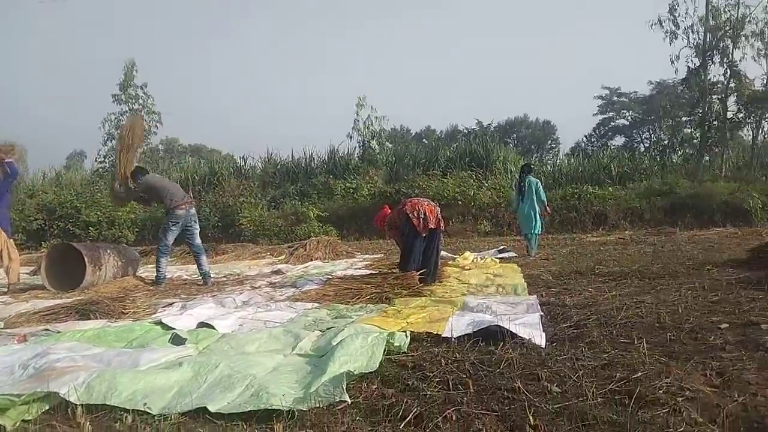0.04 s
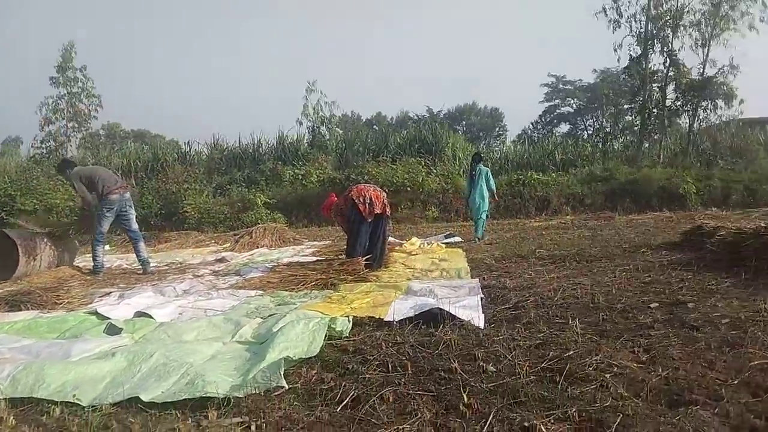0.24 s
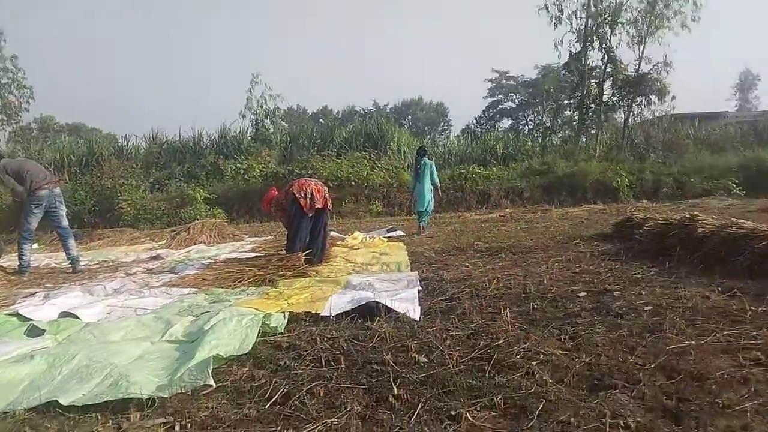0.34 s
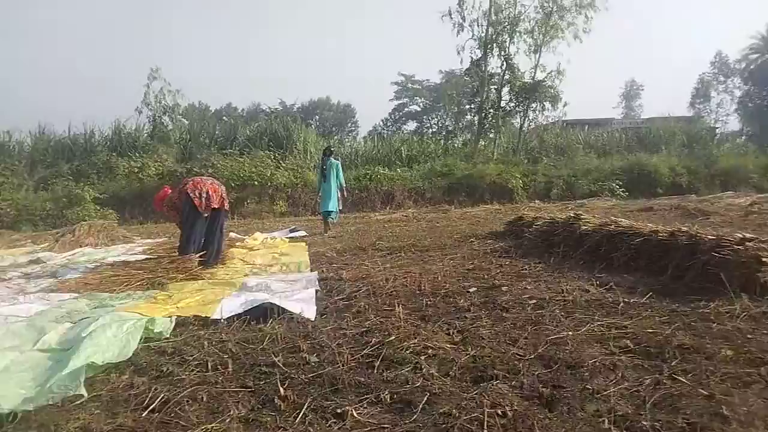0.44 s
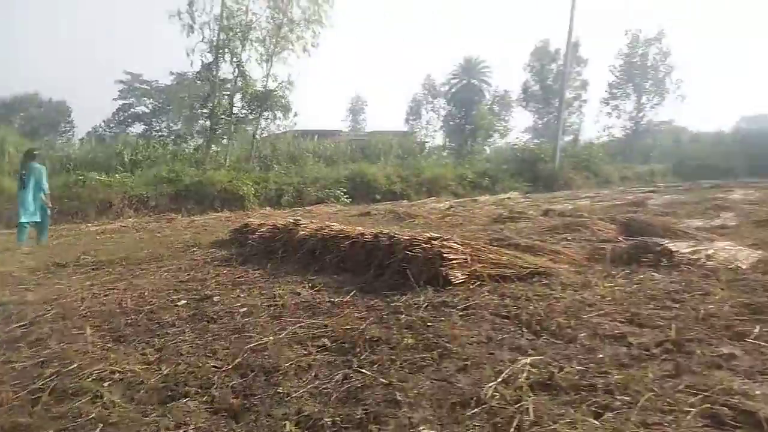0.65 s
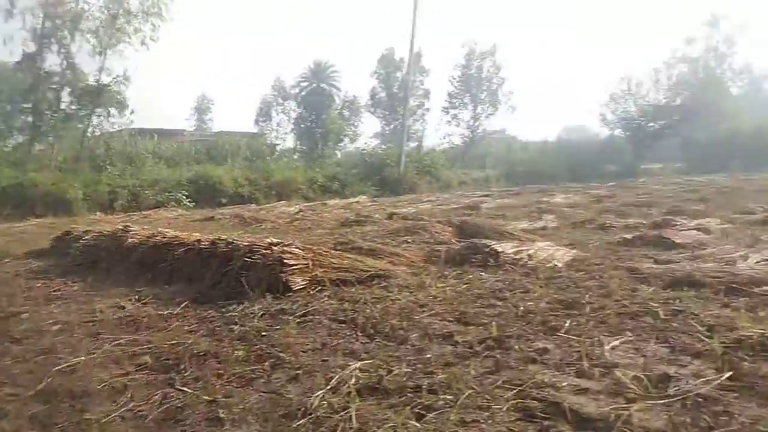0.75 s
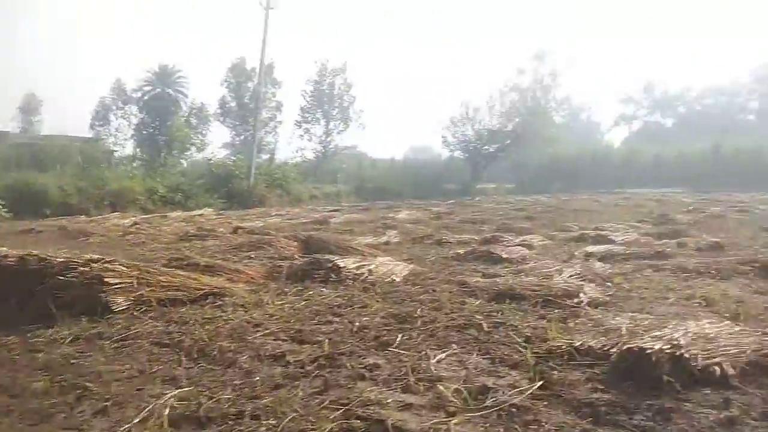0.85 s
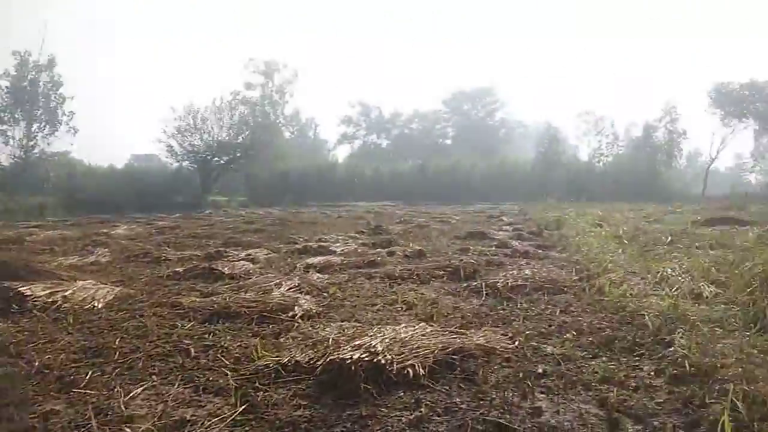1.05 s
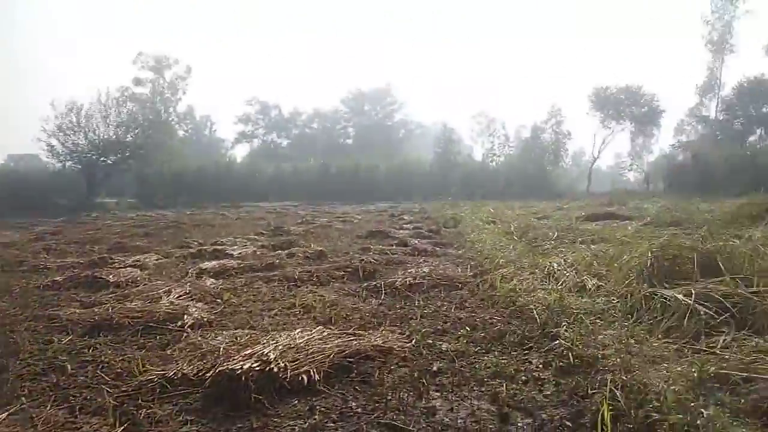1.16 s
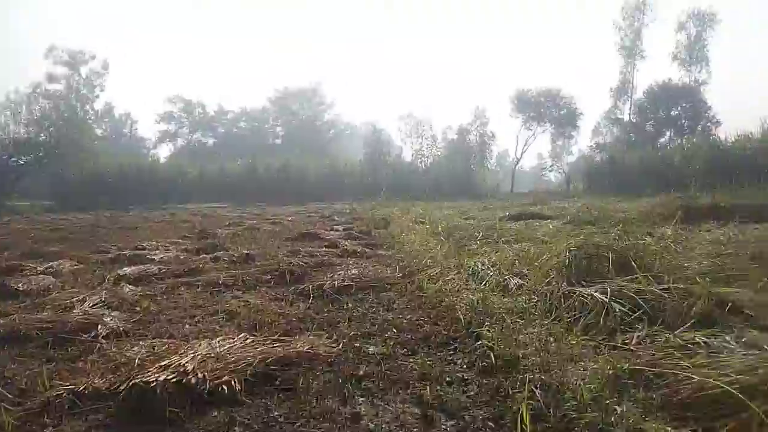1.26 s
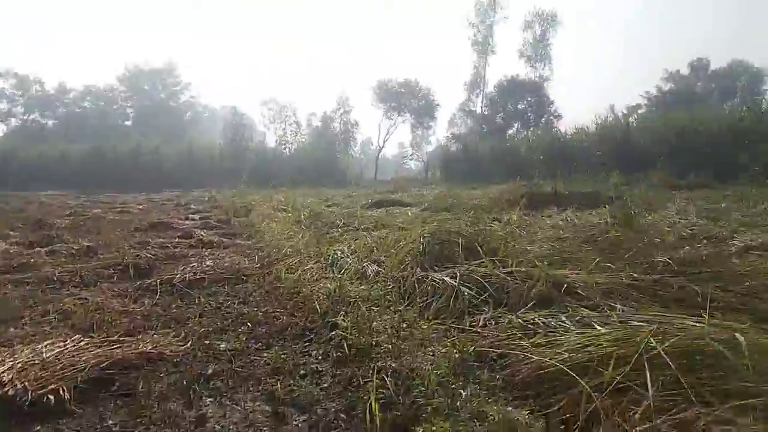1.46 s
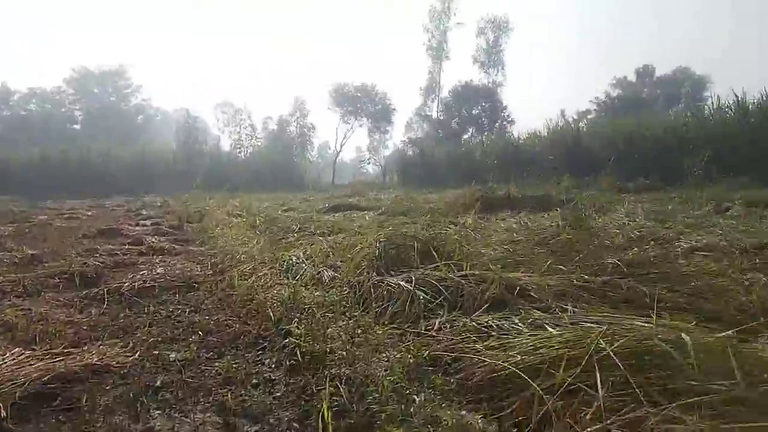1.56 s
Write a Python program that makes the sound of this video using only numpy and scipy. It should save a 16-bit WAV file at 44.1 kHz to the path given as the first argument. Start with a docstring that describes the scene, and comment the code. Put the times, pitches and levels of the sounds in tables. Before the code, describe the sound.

Rice sheaves hit a barrel twice, each a sharp slap with a hollow thud, brief ring and echo. Dry straw then hisses and crackles close to the microphone, while a far engine throbs faintly across the open field.

```python
"""Two sheaves of rice are swung down on a barrel lying in an open field.
At first dry straw rustles close by, while a far engine throbs under the faint hiss of the field.
At 0.24 s hundreds of stalks slap the shell, which thuds and rings briefly; the field's edge echoes it.
The sheaf sags, then the second one swishes down and lands at 0.68 s with an echo of its own.
Loose straw hisses as it settles, and from about 1 s nearby stalks crackle and snap."""
import sys
import numpy as np
from scipy import signal
from scipy.fft import rfft, irfft
from scipy.io import wavfile

SR = 44100
rng = np.random.default_rng(int(sys.argv[2]) if len(sys.argv) > 2 else 0)


def store_wav(level_fs):
    """Save 16-bit WAV to argv[1]."""
    pcm = np.round(np.clip(np.atleast_2d(level_fs), -1, 1) * 32767)
    wavfile.write(sys.argv[1], SR, pcm.T.astype(np.int16))


N = 70560  # 1.6 seconds

# The tone of the cracking tips, the slap, the thud and the hollow barrel.
# Each row: frequency in Hz, relative level in dB.
CRACK_TONE = [(1500, -20), (3000, -3), (3800, -3.5), (4500, -6), (6300, 1.5), (8200, -8.5), (12000, -7.5),
              (15500, -7)]
SLAP_TONE = [(150, -55), (300, -23), (520, -5), (680, -18), (930, -9.5), (1250, -8), (1600, 0), (2000, -3),
             (2400, 1), (3200, -6.5), (4500, -14), (9000, -30)]
THUD_TONE = [(30, -31), (60, -27), (85, -9.5), (135, -0.5), (200, -11), (300, -24), (600, -46)]
HOLLOW_TONE = [(120, -19), (240, 4), (400, 3.5), (540, 0.5), (680, -4), (900, -8), (1200, -8), (1800, -44)]
def sheaf(start, landing, crack_db, slap_db, thud_db, hollow_db, ring):
    """Stalk tips crack as the bundle slaps the shell; its weight thuds and the barrel sounds hollow."""
    hold = 0.0047 / ring ** 2
    crack = coloured(clicks(), CRACK_TONE) * envelope(start, landing, fade=0.11, hold=0.0015)
    slap = coloured(clicks(), SLAP_TONE) * envelope(start, landing, fade=0.17 * ring, hold=hold)
    thud = noise(THUD_TONE) * envelope(start, rise=0.013, fade=0.14, hold=0.0025)
    hollow = noise(HOLLOW_TONE) * envelope(start, rise=0.022, fade=0.24 * ring ** 2, hold=hold)
    return amp(crack_db) * crack + amp(slap_db) * slap + amp(thud_db) * thud + amp(hollow_db) * hollow


# The barrel's notes; each blow lands on another spot, so their levels differ.
# Each row: pitch in Hz, fade in seconds, level in dB in the first blow, level in dB in the second.
BARREL_NOTES = [(112, .2, -31, -46), (145, .4, -32, -36), (196, .35, -29, -45), (293, .2, -33, -40),
                (373, .7, -40, -36), (516, .17, -30, -30), (772, .11, -25, -44), (1404, .28, -46, -34),
                (1447, .2, -42, -29), (1498, .15, -26, -42), (1558, .19, -36, -33), (1712, .16, -26, -37),
                (1879, .14, -31, -36), (2000, .07, -42, -23), (2258, .17, -38, -27), (2326, .17, -30, -33),
                (2432, .17, -32, -31), (2778, .19, -39, -35), (3020, .17, -36, -41), (3790, .11, -44, -33)]
def barrel(start, landing, blow):
    """The shell's notes build up while the stalks land and die under the straw."""
    t, out = np.arange(N) / SR, np.zeros(N)
    for hz, fade, *levels_db in BARREL_NOTES:
        note = np.sin(2 * np.pi * (hz * t + rng.random()))
        out += amp(levels_db[blow]) * envelope(start, 1.84 * landing, fade) * note
    return out


# The echo's tone. Each row: frequency in Hz, relative level in dB.
ECHO_TONE = [(60, -25), (100, 0.5), (160, 6.5), (250, 6), (400, 2), (650, 0.5), (930, -9), (1700, -1),
             (2600, -5.5), (4000, -17), (7000, -20), (15000, -41)]
# How long it lasts. Each row: frequency in Hz, fade in seconds.
ECHO_FADES = [(100, 0.93), (400, 1), (1000, 0.91), (2000, 0.97), (8000, .7)]
def echo(start, rise=0.084):
    """Trees and tall crops scatter a blow back, each band of pitch dying at its own speed."""
    hz, t, bands = signal.stft(noise(ECHO_TONE), SR, nperseg=512)
    age = np.maximum(t - start - rise, 0)
    dying = np.exp(-np.log(1000) * age / look_up(ECHO_FADES, hz)[:, None])
    swell = np.clip((np.arange(N) / SR - start) / rise, 0, 1)
    return signal.istft(bands * dying, SR)[1][:N] * swell


# The two blows. Each row: start in seconds, seconds the sheaf takes to land, levels in dB of the
# crack, slap, thud, hollow sound and echo, and a factor for how freely the shell sounds on.
SHEAF_BLOWS = [(.2425, 0.0094, -26, -22, -31, -27, -38, 0.75),
               (.6775, 0.0045, -27.5, -21.5, -39, -30.5, -39.5, 1.447)]
def threshing():
    """Each sheaf strikes the barrel and sets it ringing; gives the hits and their echoes separately."""
    hits, echoes = np.zeros(N), np.zeros(N)
    for blow, (start, landing, *levels_db, echo_db, ring) in enumerate(SHEAF_BLOWS):
        hits += sheaf(start, landing, *levels_db, ring) + barrel(start, landing, blow)
        echoes += amp(echo_db) * echo(start)
    return hits, echoes


def swing():
    """Straw brushes past as the second sheaf swings down."""
    return amp(-44.5) * envelope(start=0.641, rise=0.005, fade=0.16) * noise(SLAP_TONE)


# The tone of the sagging sheaf. Each row: frequency in Hz, relative level in dB.
THUMP_TONE = [(60, -25), (100, -6.5), (160, 4.5), (260, -8), (420, -12), (900, -50), (3000, -71)]
def sag():
    """Between the blows, the sheaf sags on the barrel with a soft, low thump."""
    return amp(-37.5) * envelope(start=0.393, rise=0.0099, fade=0.23) * noise(THUMP_TONE)


def gliding_band(start=0.29, start_hz=1627, hz_per_second=1900, width_hz=67):
    """A faint, narrow band of noise rises in pitch inside the first echo."""
    hz = start_hz + hz_per_second * (np.arange(N) / SR - start)
    phase = 2 * np.pi * np.cumsum(hz) / SR
    band = wander(width_hz) * np.cos(phase) + wander(width_hz) * np.sin(phase)
    return amp(-48.5) * envelope(start, rise=0.015, fade=0.37, hold=0.18) * band


# Close rustles. Each row: start, rise and fade in seconds, level in dB, brightness in dB per octave.
RUSTLE_BURSTS = [(0.019, 0.0035, 0.23, -55.5, 10.5), (0.086, 0.01, 0.28, -59, 7),
                 (0.173, 0.0032, 0.066, -56.5, 7), (1.009, 0.042, 0.11, -43.5, -1.5),
                 (1.093, 0.0084, 0.14, -47, -1), (1.123, 0.011, 0.24, -46.5, 1.5),
                 (1.143, 0.03, 0.16, -42, -3.5), (1.2, 0.01, 0.099, -50, 0), (1.232, 0.0033, 0.13, -45, 3),
                 (1.251, 0.0036, 0.23, -46.5, -2), (1.274, .005, 0.12, -45, -6.5),
                 (1.29, 0.0027, 0.097, -46.5, 1), (1.313, .003, 0.16, -43, 4.5),
                 (1.345, .004, 0.16, -46, 2), (1.355, 0.0067, 0.27, -46, -2),
                 (1.406, 0.0037, 0.14, -44.5, 6.5), (1.431, .005, .1, -46.5, 1),
                 (1.482, 0.0021, 0.33, -46.5, 6), (1.526, 0.014, 0.26, -49, 4), (1.557, .005, 0.28, -46, 4)]
# Their tone. Each row: frequency in Hz, relative level in dB.
RUSTLE_TONE = [(400, -27), (900, -30), (1600, -13), (2900, 5.5), (4400, -2), (6300, 4.5), (8200, -5.5),
               (11000, -15.5), (15500, -13)]
def rustling_straw():
    """Nearby stalks crackle in short, clumped bursts."""
    out = np.zeros(N)
    for start, rise, fade, db, bright_db in RUSTLE_BURSTS:
        crackle = coloured(clicks(per_second=8100, spread_db=3.5), RUSTLE_TONE, bright_db)
        out += amp(db) * envelope(start, rise, fade) * crackle
    clumps_db = wander(rate_hz=120)
    return out * amp(clumps_db)


# Single stems breaking. Each row: start in seconds, pitch in Hz, level in dB.
STEM_SNAPS = [(.843, 3800, -46), (1.116, 1250, -54), (1.13, 4200, -43), (1.2755, 6400, -43),
              (1.357, 3100, -45), (1.485, 6200, -42), (1.559, 2600, -45), (1.567, 1950, -44)]
def snapping_stems(width_octaves=0.2):
    """A breaking stem rings briefly in one narrow band of pitch."""
    octaves, out = np.log2(np.fft.rfftfreq(N, 1 / SR) + 1), np.zeros(N)
    for start, hz, db in STEM_SNAPS:
        band = 1 / (1 + ((octaves - np.log2(hz)) / width_octaves) ** 2)
        ringing = evened(irfft(rfft(rng.standard_normal(N)) * band, N))
        out += amp(db) * envelope(start, rise=0.0015, fade=0.045) * ringing
    return out


# Waves of settling straw. Each row: start, rise and fade in seconds, level in dB.
SETTLING_WAVES = [(0.336, 0.028, 0.27, -44.5), (.40, 0.086, 0.34, -53.5), (.79, 0.08, 1, -48.5),
                  (.92, .07, 0.71, -49)]
# Their tone. Each row: frequency in Hz, relative level in dB.
SETTLING_TONE = [(500, -54), (1500, -20), (3000, 4.5), (4400, -2.5), (6300, -0.5), (8200, -18.5),
                 (15500, -14)]
def settling_straw():
    """Loose straw and grain hiss as they settle after the blows."""
    power = sum((amp(db) * envelope(*timing)) ** 2 for *timing, db in SETTLING_WAVES)
    return coloured(clicks(), SETTLING_TONE) * np.sqrt(power)


# The tone of the exhaust puffs. Each row: frequency in Hz, relative level in dB.
PUFF_TONE = [(20, -53), (50, -25), (100, -12), (135, -9.5), (168, 2.5), (202, 2), (240, -10.5), (300, -32),
             (500, -56), (2000, -90)]
def engine(firings_per_second=33.88, wobble=0.012, spread_db=2):
    """A far engine chugs: one dull puff per firing, uneven in strength."""
    rate = firings_per_second * (1 + wobble * wander(rate_hz=3.4))
    firings_so_far = np.floor(np.cumsum(rate) / SR)
    puffs = np.diff(firings_so_far, prepend=0) * amp(spread_db * rng.standard_normal(N))
    return amp(-54) * coloured(puffs, PUFF_TONE)


# The tone of the open air. Each row: frequency in Hz, relative level in dB.
AIR_TONE = [(25, -12), (60, -9), (100, 3.5), (170, 6.5), (280, -6.5), (500, -15), (900, -16.5),
            (1600, -7.5), (2400, -7.5), (4200, -20), (6300, -22), (8500, -31), (15500, -36)]
# How its hiss swells. Each row: time in seconds, boost in dB.
HISS_SWELL = [(0, 1.5), (.2, -1), (.55, 4.5), (.9, 3.5), (1.22, 1), (1.47, 6.5), (1.6, 5.5)]
def field():
    """The open air murmurs low and steady, with a fine hiss that swells and flickers."""
    air = noise(AIR_TONE)
    murmur = signal.sosfiltfilt(signal.butter(2, 900, fs=SR, output="sos"), air)
    hiss = air - murmur
    swell_db = np.interp(np.arange(N) / SR, *np.transpose(HISS_SWELL))
    flicker_db = 1.36 * wander(rate_hz=27)
    return amp(-52) * (murmur + hiss * amp(swell_db + flicker_db))


# The band the ground changes. Each row: time in seconds, centre in Hz, cut in dB (negative boosts).
GROUND_BAND = [(0, 615, 0.5), (.2, 680, 1), (.5, 970, -4), (.9, 970, 5.5), (1.12, 920, 7.5), (1.22, 775, 1),
               (1.35, 756, -4), (1.6, 610, -2.5)]
def ground_bounce(x, width_octaves=0.53):
    """Sound bouncing off the ground cuts or lifts one band, which drifts as the microphone moves."""
    hz, t, bands = signal.stft(x, SR, nperseg=1024)
    times, centre_hz, cut_db = np.transpose(GROUND_BAND)
    distance = np.log2((hz[:, None] + 1) / np.interp(t, times, centre_hz)) / width_octaves
    gain_db = -np.interp(t, times, cut_db) * np.exp(-distance ** 2)
    return signal.istft(bands * amp(gain_db), SR)[1][:N]


def amp(db):
    """Turns decibels into a number to multiply by."""
    return 10 ** (np.asarray(db) / 20)


def evened(x):
    """Scales a signal to an average power of 1."""
    return x / np.sqrt(np.mean(x ** 2) + 1e-20)


def look_up(table, hz):
    """Reads between a table's rows, with frequency spaced in octaves."""
    row_hz, values = np.transpose(table)
    return np.interp(np.log(hz + 1), np.log(row_hz + 1), values)


def coloured(x, tone, bright_db=0):
    """Gives x a tone, tilted by bright_db per octave, at an average power of 1."""
    hz = np.fft.rfftfreq(N, 1 / SR)
    gain_db = look_up(tone, hz) + bright_db * np.log2(hz + 1)
    return evened(irfft(rfft(x) * amp(gain_db), N))


def noise(tone):
    """Smooth noise with the given tone."""
    return coloured(rng.standard_normal(N), tone)


def wander(rate_hz):
    """A random drift around zero; a higher rate makes it move faster."""
    hz = np.fft.rfftfreq(N, 1 / SR)
    smoothing = (hz > 0) * np.exp(-(hz / rate_hz) ** 2)
    return evened(irfft(rfft(rng.standard_normal(N)) * smoothing, N))


def clicks(per_second=9000, spread_db=1):
    """Many stalks click at random moments, a few louder than the rest."""
    size = amp(spread_db * np.minimum(rng.exponential(1, N), 4))
    return size * rng.choice([-1., 1.], N) * (rng.random(N) < per_second / SR)


def envelope(start, rise, fade, hold=0):
    """Loudness rises, holds, then dies away; fade is the seconds it takes to drop 60 dB."""
    t = np.arange(N) / SR - start
    return np.clip(t / rise, 0, 1) * np.exp(-np.log(1000) * np.maximum(t - rise - hold, 0) / fade)


def scene():
    """The blows over the sounds of the field, in one channel."""
    background = field() + engine() + settling_straw() + rustling_straw()
    handling = swing() + sag()
    hits, echoes = threshing()
    return (hits + handling + snapping_stems() + gliding_band() + ground_bounce(background + echoes))[None]


def record(dry, low_cut_hz=47, high_cut_hz=15800):
    """The small microphone loses the deep bass; the very highest treble is cut too."""
    thin = signal.sosfilt(signal.butter(2, low_cut_hz, "high", fs=SR, output="sos"), dry)
    treble_cut = signal.firwin(511, high_cut_hz, window=("kaiser", 9), fs=SR)
    return signal.oaconvolve(thin, treble_cut[None], "same")


dry = scene()
out = record(dry)
store_wav(out)
```